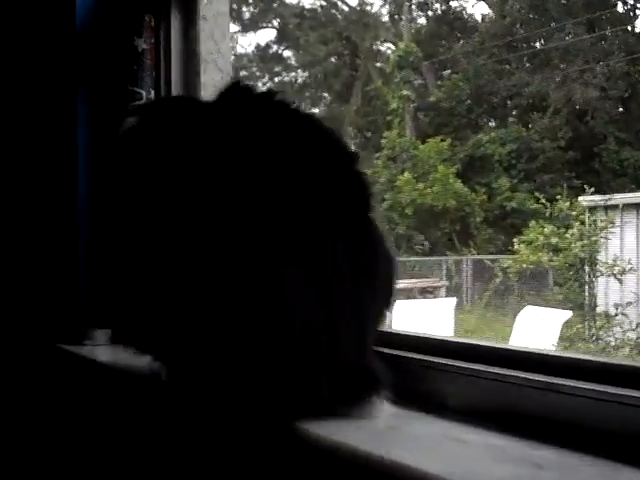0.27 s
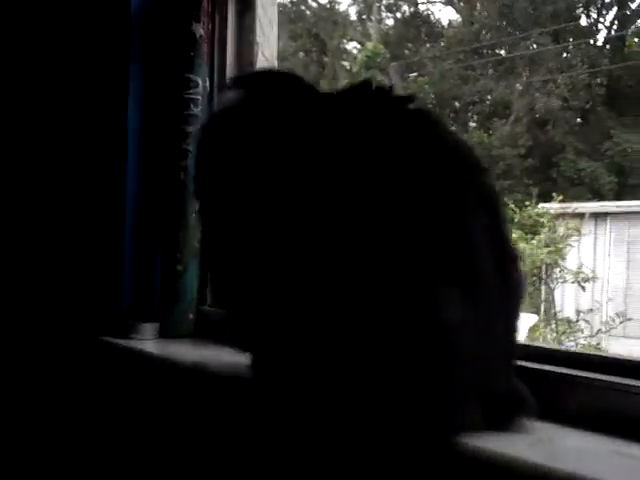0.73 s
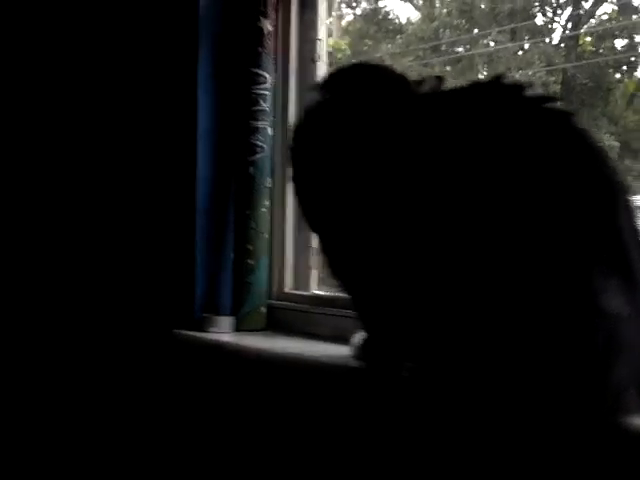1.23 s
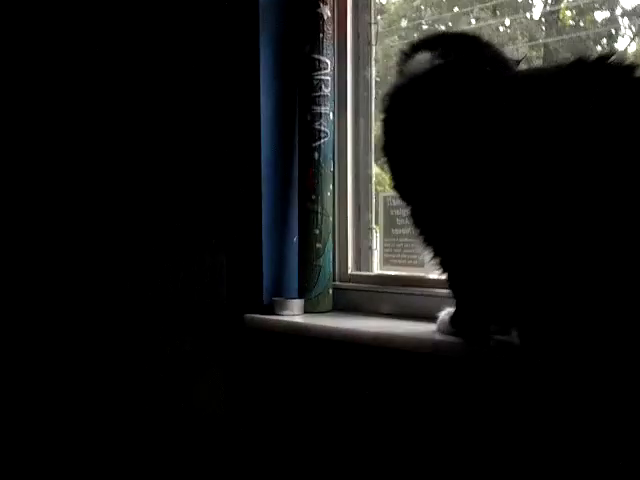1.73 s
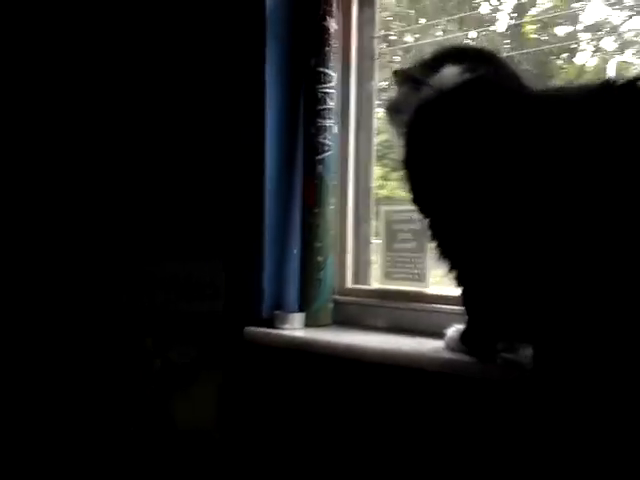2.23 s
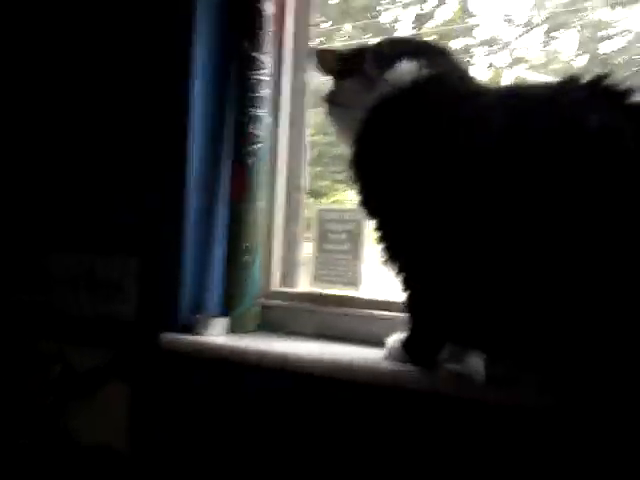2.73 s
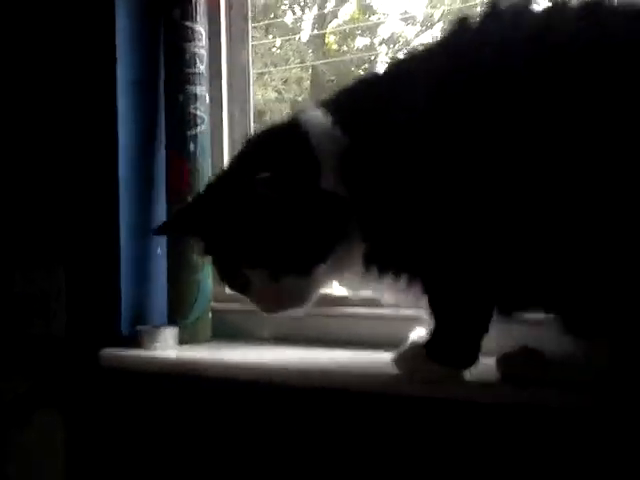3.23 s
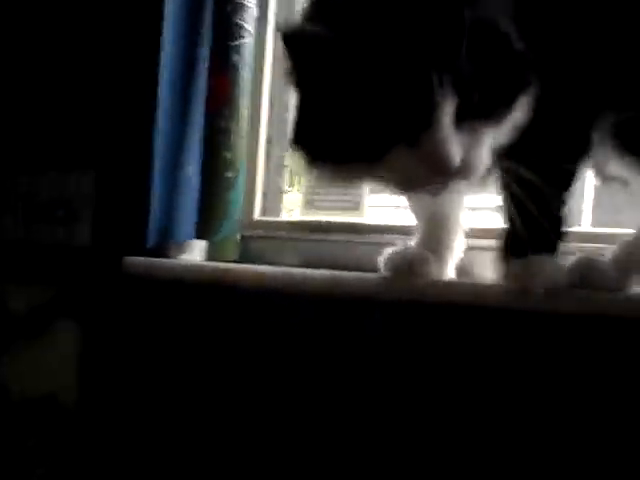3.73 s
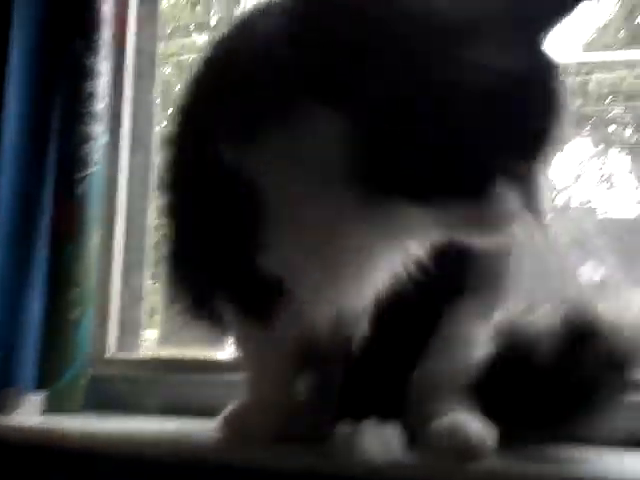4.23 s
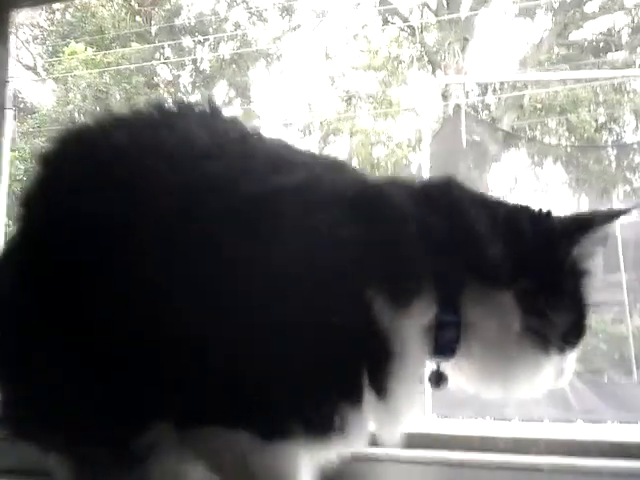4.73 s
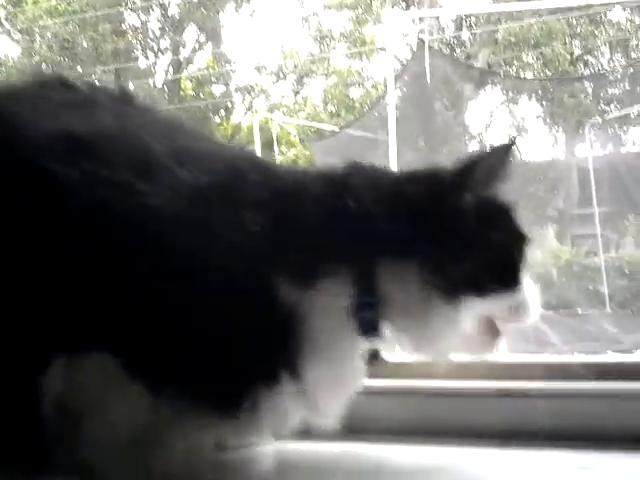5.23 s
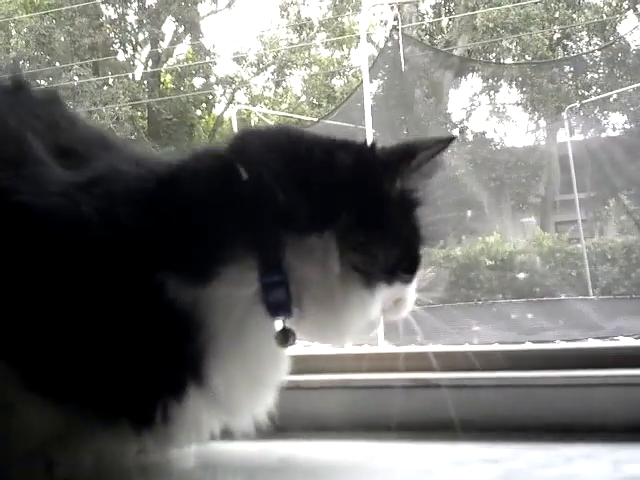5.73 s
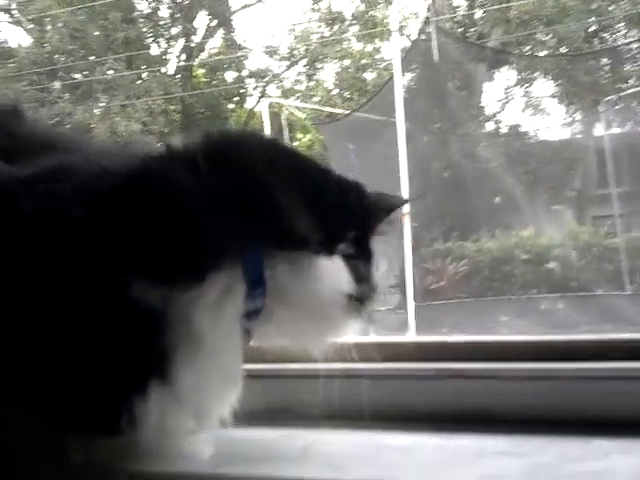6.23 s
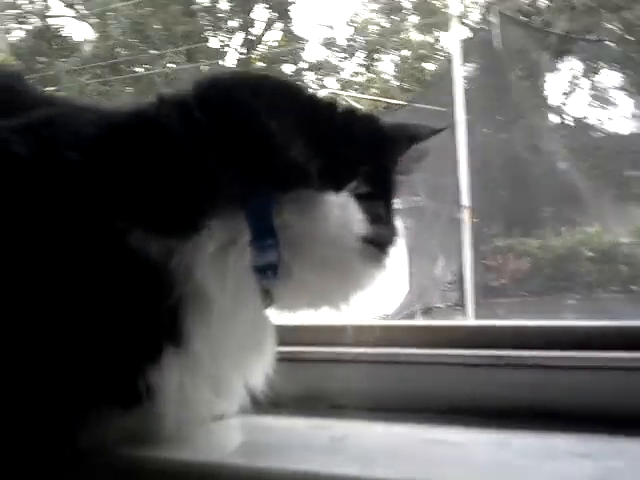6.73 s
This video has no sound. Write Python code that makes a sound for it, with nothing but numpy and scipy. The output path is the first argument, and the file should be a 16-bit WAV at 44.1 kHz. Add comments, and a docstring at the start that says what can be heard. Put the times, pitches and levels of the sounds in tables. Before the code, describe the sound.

A cat chirps in short bursts after a faint collar bell jingle and four knocks on a window sill, over a low indoor hum.

```python
"""An appliance hums and a picture tube whistles in a small room. A cat on a window sill jingles its
collar bell, a shell rung by a loose pea. Four knocks excite the sill's resonances and set metal and
glass buzzing; a finger ticks on the camera's left microphone. Then the cat chirps at birds: vocal-fold
pulses and breath, filtered by its mouth. Each channel subtracts a delayed copy of the other capsule,
which comb-filters the sound."""
import sys
import numpy as np
from scipy import signal
from scipy.fft import rfft, irfft, next_fast_len
from scipy.io import wavfile

SR = 44100
rng = np.random.default_rng(int(sys.argv[2]) if len(sys.argv) > 2 else 0)


def int16_out(signal):
    """Quantize to a 16-bit WAV file."""
    q = np.round(np.clip(np.atleast_2d(signal).T, -1, 1) * 32767)
    wavfile.write(sys.argv[1], SR, q.astype(np.int16))


N = 307818
T = np.arange(N) / SR


def undb(db):
    """Decibels to amplitude ratio."""
    return 10 ** (np.asarray(db, float) / 20)


def unit_rms(x):
    """Normalisation to an RMS of 1."""
    return x / np.sqrt(np.mean(x ** 2))


def unit_peak(x):
    """Normalisation to a peak of 1."""
    return x / np.abs(x).max()


def resonate(x, hz, width_hz):
    """Second-order resonance with gain 1 at its centre."""
    return signal.lfilter(*signal.iirpeak(hz, hz / width_hz, SR), x)


def body(x, resonances):
    """Parallel resonances, each applied twice for steep skirts."""
    return sum(undb(db) * resonate(resonate(x, hz, width), hz, width) for hz, width, db in resonances)


def drift(rate_hz, size=N):
    """Random modulation: noise low-passed at rate_hz, with an RMS of 1."""
    pad = int(3 * SR / rate_hz)
    lowpass = signal.butter(2, rate_hz, fs=SR, output="sos")
    return unit_rms(signal.sosfilt(lowpass, rng.standard_normal(size + pad))[pad:])


def add(out, start_s, x):
    """Superposition of x on out from start_s."""
    i = int(start_s * SR)
    out[i:i + len(x)] += x[:len(out) - i]


def shadowed(x, corner_hz, q):
    """Acoustic shadow: the camera dulls and delays the far capsule's sound. Returns (near, far)."""
    w = 2 * np.pi * corner_hz
    lowpass = signal.bilinear([w * w], [1, w / q, w * w], SR)
    return np.array([x, signal.lfilter(*lowpass, x)])


def diffuse_spectra(size, coherent_below_hz=790):
    """Diffuse field: noise at two close capsules is coherent in the bass, unrelated in the treble."""
    hz = np.fft.rfftfreq(size, 1 / SR)
    coherence = 1 / (1 + (hz / coherent_below_hz) ** 3)
    mid, side = rfft(rng.standard_normal((2, size)))
    mid, side = mid * np.sqrt((1 + coherence) / 2), side * np.sqrt((1 - coherence) / 2)
    return np.array([mid + side, mid - side]), hz


# Spectrum of the noise floor: (frequency [Hz], spectral density [dB re 1/Hz])
AIR_SPECTRUM = [(25, -102), (60, -82), (110, -69), (200, -72), (350, -79), (550, -80), (900, -90.5),
                (1700, -95), (2800, -100), (5000, -106), (8000, -110), (11500, -112), (14000, -109),
                (15600, -105)]
def air():
    """Stationary broadband noise: the room's background and capsule hiss."""
    size = next_fast_len(N)
    spectra, hz = diffuse_spectra(size)
    nodes_hz, nodes_db = np.transpose(AIR_SPECTRUM)
    density = undb(np.interp(np.log(hz + 1), np.log(nodes_hz), nodes_db))
    noise = irfft(spectra * density * np.sqrt(SR / 2), size)
    return noise[:, :N] * undb(0.014 * drift(2.2))


def rumble(band_hz=(60, 323), db=-56.5):
    """Handling noise: each capsule picks up its own uncorrelated rumble."""
    band = signal.butter(2, band_hz, "band", fs=SR, output="sos")
    return undb(db) * unit_rms(signal.sosfilt(band, rng.standard_normal((2, N))))


# Lines of the hum: (frequency [Hz])
HUM_LINES_HZ = [114.6, 117.0, 119.9, 234.1, 240.0, 351.1, 359.9]
# Strength of each line: (level [dB])
HUM_LINES_DB = [-57, -49, -55, -49, -60.5, -64, -65.5]
def hum():
    """Beating: two motors and the mains give tones close in frequency."""
    out = np.zeros(N)
    for hz, db in zip(HUM_LINES_HZ, HUM_LINES_DB):
        amplitude = np.sqrt(2) * undb(db + 0.75 * drift(4.5))
        out += amplitude * np.sin(2 * np.pi * hz * T + rng.uniform(0, 2 * np.pi))
    return out


def whistle(line_hz=15730, field_hz=59.94, db=-62.5):
    """Amplitude modulation: the tube's line tone pulses at the field rate; level and phase waver."""
    pulse = 1 + .15 * np.cos(2 * np.pi * field_hz * T)
    amplitude = undb(db + 0.43 * drift(5.2) + 5.3 * drift(17.0))
    return amplitude * pulse * np.sin(2 * np.pi * line_hz * T + 1.8 * drift(5.09))


# Decay of the room: (frequency [Hz], reverberation time T60 [s])
ROOM_DECAY = [(200, 0.13), (600, 0.28), (2000, 0.38), (6000, 0.2), (15000, 0.056)]
def room(x, gap_s):
    """Reverberation: dense echoes set in after a gap and decay exponentially, band by band."""
    size = SR // 2
    spectra, hz = diffuse_spectra(size)
    t, tail = np.arange(size) / SR, 0
    nodes_hz, t60s = np.transpose(ROOM_DECAY)
    for k, t60 in enumerate(t60s):
        band = np.interp(np.log(hz + 1), np.log(nodes_hz), np.arange(len(nodes_hz)) == k)
        tail = tail + irfft(spectra * band, size) * undb(-60 * t / t60)
    tail = tail * np.clip(t / gap_s - 1, 0, 1)
    return signal.fftconvolve(x[None], unit_rms(tail) / np.sqrt(size), axes=1)[:, :N]


# Finger contacts: (time [s], level [dB], centre [Hz], bandwidth [Hz], scratch [ratio], bare snap [dB])
FINGER_TICKS = [(2.5432, -42, 10600, 5000, .3, -15), (2.5499, -14.5, 2130, 2360, 0.36, 0.5),
                (2.5532, -24, 9900, 6000, 0.64, -4), (2.569, -41, 8000, 3000, .3, -15),
                (2.591, -38, 7500, 3000, 0.33, -13), (2.622, -28.5, 1800, 2470, 0.1, -12),
                (2.6845, -16, 4320, 4020, 0.15, 0), (2.6945, -34, 6000, 5000, .3, -12)]
def finger():
    """Impulse response: a snap and a short scratch excite the camera's heavily damped shell."""
    out, t = np.zeros(N), np.arange(300) / SR
    for start, db, hz, width_hz, scratch, snap_db in FINGER_TICKS:
        snap = scratch * rng.standard_normal(len(t)) * np.exp(-t / 0.00029)
        snap[0] = 1
        tick = unit_peak(resonate(snap, hz, width_hz)) + undb(snap_db) * snap
        add(out, start, undb(db) * unit_peak(tick))
    return out


# Strikes of the pea: (time [s], level [dB], time constant of the rattle [s])
PEA_STRIKES = [(0.249, -52, 0.03), (0.275, -60, 0.03), (0.3621, -63, 0.03), (1.167, -55, 0.012),
               (1.182, -57, 0.015), (1.259, -47, 0.008), (1.271, -47, 0.014), (1.323, -54, 0.012),
               (1.339, -53, 0.02)]
# Modes of the bell's shell: (frequency [Hz], gain [dB], decay time T60 [s])
BELL_MODES = [(5730, -5, .05), (5830, 0, .065), (5950, -6, .04), (6150, -13, .04), (6420, -14, .035),
              (6770, -20, .025)]
def bell(bounces_per_s=150, strike_hz=6000, strike_width_hz=2200, tick_db=12):
    """Free vibration: the shell's modes ring as the pea strikes and bounces in weakening hits."""
    hits, t = np.zeros(N), np.arange(int(.2 * SR)) / SR
    for start, db, decay_s in PEA_STRIKES:
        bounces = (rng.random(len(t)) < bounces_per_s / SR) * rng.standard_normal(len(t)) * .5
        bounces[0] = 1
        add(hits, start, undb(db) * bounces * np.exp(-t / decay_s))
    force = resonate(hits, strike_hz, strike_width_hz)
    ring = np.zeros(N)
    for hz, db, t60 in BELL_MODES:
        pole = np.exp((2j * np.pi * hz - np.log(1000) / t60) / SR)
        ring += undb(db) * signal.lfilter([1], [1, -pole], force).imag
    return ring + undb(tick_db) * resonate(hits, strike_hz, width_hz=strike_hz)


# Resonances of the sill: (frequency [Hz], bandwidth [Hz], gain [dB])
SILL_MODES = [(349, 267, 11.5), (529, 165, 8), (813, 1150, -10), (1350, 175, -9.5), (1955, 250, -6.5),
              (3350, 800, -17.5), (4600, 620, -9)]
# Resonances of loose metal and glass: (frequency [Hz], bandwidth [Hz], gain [dB])
BUZZ_MODES = [(5100, 400, -26), (6600, 8700, -9), (8800, 840, -7), (9660, 1400, -9), (11530, 440, 3),
              (14900, 1500, 6)]
# Blows on the sill: (time [s], level [dB], relative buzz [dB], contact [ms], tilt set by the striking
# point [dB/octave], spacing of two lighter lead-in touches [ms], step per touch [dB], pane echo [dB])
SILL_KNOCKS = [(0.6024, -12.5, -31.5, 0.27, 1, 2.127, -4.5, -16),
               (1.936, -13, -30, 0.33, -3, 2.17, -13, -11.5),
               (2.374, -15, -28, 0.31, -0.5, 2.12, -14, -6.5),
               (2.6468, -18.5, -28, 0.28, -1.5, 2.07, -12.5, -11)]
def knock(start, db, buzz_db, contact_ms, tilt_db, touch_ms, touch_db, echo_db):
    """Damped impact: a half-sine force drives the sill; the wall thuds and loose parts buzz on."""
    damping_s, radiation_hz, echo_s = 0.006, 290, 0.0059
    thud_hz, thud_s, thud_db = 86, 0.0022, -21.5
    out, t = np.zeros(N), np.arange(4000) / SR
    pivot_hz = SILL_MODES[1][0]
    modes = [(hz, width, gain + tilt_db * np.log2(hz / pivot_hz)) for hz, width, gain in SILL_MODES]
    force = np.sin(np.pi * np.clip(1000 * t / contact_ms, 0, 1))
    sill = body(force, modes) * np.exp(-(t / damping_s) ** 2)  # the striker stays on and stills it
    highpass = signal.butter(2, radiation_hz, "high", fs=SR, output="sos")
    sill = signal.sosfilt(highpass, sill)  # a narrow sill radiates little bass
    wall_force = np.sin(np.pi * np.clip(t / thud_s, 0, 1))
    thud = resonate(wall_force, thud_hz, width_hz=thud_hz)
    blow = undb(db) * (unit_peak(sill) + undb(thud_db) * unit_peak(thud))
    for touch in (1, 2):
        add(out, start - touch * touch_ms / 1000, undb(touch * touch_db) * blow)
    add(out, start, blow)
    add(out, start + echo_s, undb(echo_db) * blow)
    shake = rng.standard_normal(len(t)) * np.exp(-t / 0.026)
    add(out, start, undb(db + buzz_db) * unit_rms(body(shake, BUZZ_MODES)))
    return out


# Clicks and puffs of the mouth: (time [s], level [dB], centre [Hz], bandwidth [Hz], time constant [s])
MOUTH_SMACKS = [(3.323, -54, 4270, 2500, 0.002), (3.791, -28, 2530, 2530, 0.002),
                (5.029, -46, 2230, 2280, 0.019), (5.047, -54, 3500, 3000, 0.003),
                (5.136, -48, 3500, 1200, 0.0044), (5.2, -39, 7000, 5000, 0.0079),
                (5.483, -56, 6240, 1400, 0.047), (5.691, -50.5, 3980, 1500, 0.012),
                (5.781, -41, 800, 1200, 0.0022)]
def smacks():
    """Transient excitation: each wet click or puff is a decaying noise burst through a resonance."""
    out, t = np.zeros(N), np.arange(int(.08 * SR)) / SR
    for start, db, hz, width_hz, decay_s in MOUTH_SMACKS:
        burst = rng.standard_normal(len(t)) * np.exp(-t / decay_s)
        add(out, start, undb(db) * unit_peak(body(burst, [(hz, width_hz, 0)])))
    return out


# Contour of the voice, one list per chirp: (time [s], pitch [Hz], level [dB])
CHIRP_CONTOURS = [
    [(2.91, 930, -39), (2.914, 740, -36.5), (2.923, 708, -40), (2.925, 637, -37.5), (2.942, 634.6, -35),
     (2.955, 642, -36), (2.958, 737, -37), (2.966, 722, -38.5), (2.979, 729, -32.5), (2.982, 645, -42),
     (3.004, 643, -39)],
    [(3.312, 860, -39), (3.321, 877, -53), (3.325, 877, -34), (3.33, 825, -44), (3.338, 729, -40),
     (3.35, 727, -41.5), (3.36, 760, -41), (3.372, 764, -40), (3.39, 756, -43), (3.4, 747, -52),
     (3.412, 734, -42.5)],
    [(3.628, 620, -58), (3.65, 700, -48), (3.657, 572, -52), (3.672, 669, -53), (3.681, 520, -41),
     (3.698, 620, -47.5), (3.708, 553, -43), (3.728, 620, -44.5), (3.742, 575, -42), (3.758, 602, -45.5),
     (3.788, 619, -47)],
    [(3.7912, 708, -23), (3.797, 624.4, -34.5), (3.818, 620, -30), (3.838, 613.5, -33), (3.843, 570, -31),
     (3.856, 664, -35.5), (3.866, 614, -44), (3.885, 598, -49.5)],
    [(5.133, 863, -58), (5.138, 863, -41), (5.144, 820, -52), (5.15, 804, -40.5), (5.164, 801, -41),
     (5.172, 761, -38), (5.184, 636, -38.5), (5.194, 662, -43), (5.2, 680, -53)],
    [(5.778, 733, -54), (5.782, 708, -50), (5.795, 688, -46), (5.825, 655, -46), (5.834, 667, -51.5)],
]
# Mouth resonances, one list per chirp: (frequency [Hz], bandwidth [Hz], start gain [dB], end gain [dB])
FORMANTS = [
    [(700, 200, -6, -5.5), (1490, 185, 11, 6), (1935, 240, 17, 6), (3190, 250, 6.5, -6),
     (3700, 200, -12, -22), (5600, 910, -36, -30)],
    [(760, 180, 5, 0.5), (1580, 550, 10.5, -1), (2160, 230, 9, -1), (3020, 260, 17, -6),
     (3700, 400, -0.5, 0.5), (5530, 650, -16, 2)],
    [(547, 160, 2, -7), (1240, 270, 2, 2.5), (1800, 260, -5, -2.5), (2430, 400, -18, -14),
     (3570, 920, -29, -20)],
    [(620, 1300, -11.5, -3), (1290, 370, 8.5, -4.5), (1680, 880, 3.5, -3), (2970, 220, 5, -2),
     (4420, 580, -5, -19), (5800, 1500, -40, 3)],
    [(790, 190, 0.5, 4), (1510, 230, 2, -10), (2210, 520, 3.5, 3.5), (3220, 240, -3, 1), (3700, 350, -1, 2),
     (5450, 1200, -17, -12)],
    [(674, 220, 9, 6.5), (1350, 360, -3, 0), (2210, 400, -10, -8), (3400, 450, 0, -7), (4100, 400, 0, 1),
     (4730, 570, -4, -4)],
]
# Voicing of each chirp: (base roughness [0-1], breath re voice at the start [dB], at the end [dB])
PHONATION = [(.3, -14, -6), (.28, -14, 2), (0, -24, -18), (0, -30, 0), (.04, -22, 3), (.25, -10, -3)]
# Hiss of breath past the teeth: (frequency [Hz], bandwidth [Hz], gain [dB])
BREATH_BANDS = [(1500, 470, 13), (2090, 490, 17), (3700, 580, 3), (6040, 1270, 2), (9060, 470, -3),
                (12700, 1600, -20)]
def chirps(fray_from=0.55, fray_roughness=0.4, crackle_db=5, release_s=0.032):
    """Source and filter: the mouth shapes vocal-fold pulses, roughened by jitter and shimmer."""
    out = np.zeros(N)
    for contour, formants, (base_roughness, start_db, end_db) in zip(CHIRP_CONTOURS, FORMANTS, PHONATION):
        times, pitches, levels = np.transpose(contour)
        t = np.arange(times[0], times[-1] + 0.023, 1 / SR)
        size = len(t)
        hz, db = np.interp(t, times, pitches), np.interp(t, times, levels)
        progress = np.clip((t - times[0]) / (times[-1] - times[0]), 0, 1)
        fray = np.clip((progress - fray_from) / (1 - fray_from), 0, 1)  # the folds lose grip
        roughness = base_roughness + fray_roughness * fray
        jitter = (.004 + .04 * roughness) * drift(200, size)
        phase = 2 * np.pi * np.cumsum(hz * (1 + jitter)) / SR
        flutter_db = 1 + 6 * roughness  # each harmonic wavers on its own
        folds = sum(np.cos(k * phase) * undb(flutter_db * drift(60, size)) for k in range(1, 13))
        shimmer = undb(6 * roughness * drift(110, size))
        breath = (1 + np.cos(phase)) * rng.standard_normal(size)  # pulsed by the folds
        breath *= undb(crackle_db * drift(300, size))  # spit breaks it into grains
        mouth = [(f, width, first + (last - first) * progress) for f, width, first, last in formants]
        voice = unit_rms(body(folds * shimmer, mouth))
        hiss = undb(start_db + (end_db - start_db) * progress) * unit_rms(body(breath, BREATH_BANDS))
        release = np.clip((t[-1] - t) / release_s, 0, 1)
        add(out, times[0], (voice + hiss) * undb(db) * release)
    return out


def scene(left_lag_samples=2):
    """Superposition of direct sound, reverberation and background at the (left, right) capsules."""
    voice, jingle = chirps() + smacks(), bell()
    direct = shadowed(voice, 1650, q=0.83) + shadowed(jingle, 2200, q=0.85)
    reverb = undb(-13) * room(voice, gap_s=0.0016) + undb(-1.5) * room(jingle, gap_s=0.0014)
    # the blows come from slightly right; each lands elsewhere and so wakes its own pattern of echoes
    blows = [knock(*row) for row in SILL_KNOCKS]
    knocks = sum(shadowed(x, 5000, q=.5)[::-1] + undb(-4) * room(x, gap_s=0.0037) for x in blows)
    left, right = hum() + air()
    background = np.array([np.roll(left, left_lag_samples), right]) + rumble()
    background += np.array([whistle(), whistle()])  # wavers differently at each capsule
    ticks = finger() * undb([[0], [-44]])
    return direct + reverb + knocks + ticks + background


def record(dry, imbalance_db=1.6, delay_samples=16, cutoff_hz=15820):
    """Comb filtering: each channel subtracts the other, delayed, to widen the image; then a top cut."""
    capsules = dry * undb([[imbalance_db / 2], [-imbalance_db / 2]])
    opposite = np.pad(capsules[::-1], ((0, 0), (delay_samples, 0)))[:, :N]
    lowpass = signal.ellip(10, .2, 60, cutoff_hz, fs=SR, output="sos")
    return signal.sosfilt(lowpass, capsules - opposite)


dry = scene()
out = record(dry)
int16_out(out)
```